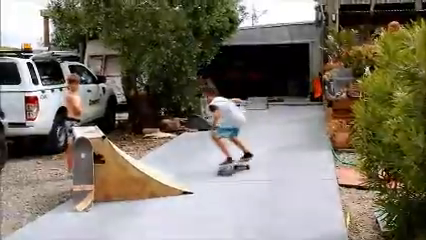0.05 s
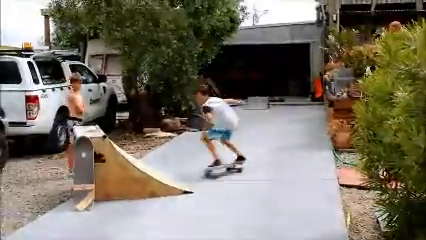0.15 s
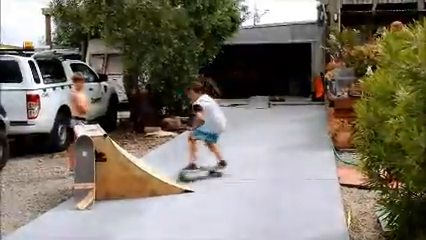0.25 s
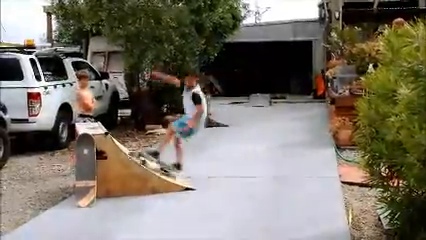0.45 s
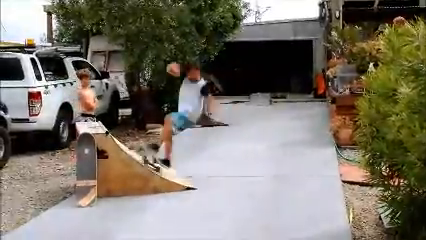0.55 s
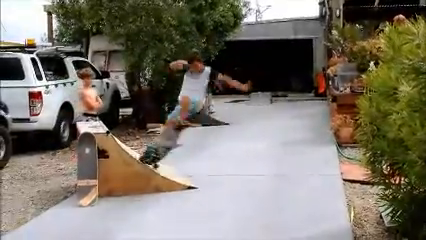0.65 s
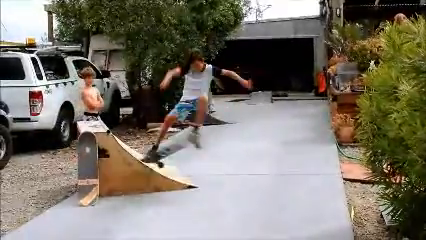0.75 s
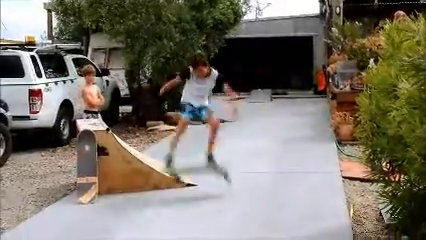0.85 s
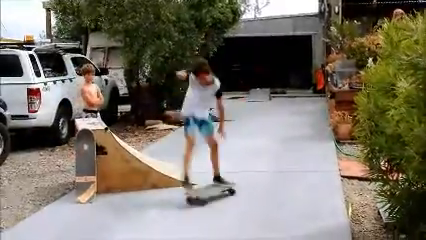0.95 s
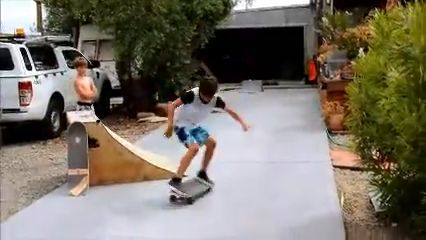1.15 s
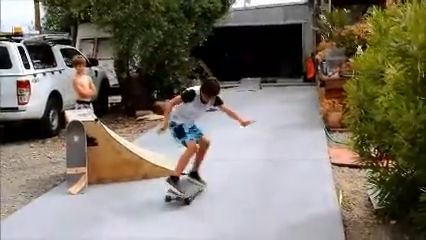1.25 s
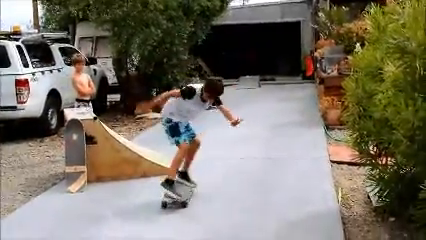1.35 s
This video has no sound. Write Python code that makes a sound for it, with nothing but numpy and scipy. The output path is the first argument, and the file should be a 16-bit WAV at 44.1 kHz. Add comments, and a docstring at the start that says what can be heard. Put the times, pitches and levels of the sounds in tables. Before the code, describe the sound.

A skateboard rumbles over rough concrete, knocks onto a hollow plywood ramp, pops off it and slaps back down with a sharp clatter. Light wind buffets the microphone, and the yard gives a short echo.

```python
"""Concrete driveway with a hollow plywood ramp. A skateboard rumbles over grit and flaws, then knocks
onto the ramp, front wheels then back. It scuffs, pops off the ramp, scrapes, and slaps down on the
concrete with a clatter of deck, trucks and wheels.
Wind nudges the microphone; the yard gives a short echo."""
import sys
import numpy as np
from scipy import signal
from scipy.io import wavfile

SR = 44100
rng = np.random.default_rng(int(sys.argv[2]) if len(sys.argv) > 2 else 0)


def dump(signal):
    """Clip the signal to [-1, 1] and save it as 16-bit WAV at the path in sys.argv[1]."""
    limited = np.clip(np.atleast_2d(signal).T, -1, 1)
    pcm = np.round(limited * 32767).astype(np.int16)
    wavfile.write(sys.argv[1], SR, pcm)


N = 61739
TIME_S = np.arange(N) / SR
PUSH_S = 0.0036  # rise time constant of a boom
# deck flex modes: f/Hz, level/dB, t60/s
DECK_MODES = [(272, 5, 0.034), (386.4, 14.5, 0.024), (476.3, -10, 0.13), (613, 1, 0.057), (705, -1, 0.035),
              (814, -10, 0.031), (907, -8, 0.063)]


def ramp_hits(deck_db=-7, boom_width_oct=0.37):
    """Wheels clack on the plywood, which booms in the modes nearest the struck spot; the deck rings."""
    # blows: t/s, boom/dB, boom centre/Hz, clack/dB, clack cutoff/Hz, chatter decay/s
    hits = [(0.444, -26, 165, -20.5, 2440, 0.0099), (0.4494, -12, 174, -32, 6400, 0.027),
            (0.454, -12, 213, -14.5, 2690, 0.02), (0.4649, -14.5, 234, -18, 2730, 0.014),
            (.4705, -6, 228, -27, 2470, 0.0095), (.574, -17, 147, -25, 8800, 0.006),
            (0.586, -16.5, 162, -21, 3020, 0.011), (.595, -10, 383, -20, 1650, 0.015),
            (0.607, -18, 128, -28.5, 2550, 0.013)]
    # plywood modes: f/Hz, level/dB, t60/s
    ramp_modes = [(136, -3, 0.042), (179, -2, 0.066), (220, 11.5, 0.032), (258, 8, 0.064),
                  (298.5, -8.5, 0.29), (354, 9.5, 0.055), (400, 0.5, 0.041)]
    # clack spectrum: f/Hz, level/dB
    clack_spectrum = [(100, -11), (400, -2.5), (560, -6.5), (850, 2.5), (1150, -8.5), (1600, -1),
                      (1950, -4.5), (2250, 2.5), (2800, -6), (5000, -6.5), (8000, -12.5), (11000, -11)]
    out, t = np.zeros(N), TIME_S[:N // 3]
    for s, boom_db, centre_hz, clack_db, cutoff_hz, chatter_s in hits:
        excited = [(hz, db - 6 * (np.log2(hz / centre_hz) / boom_width_oct) ** 2, t60)
                   for hz, db, t60 in ramp_modes]
        boom = -ring(excited, t) * (1 - np.exp(-t / PUSH_S))
        clack = colour(contact(t, cutoff_hz, chatter_db=0.5, chatter_s=chatter_s), clack_spectrum)
        add(out, s, blow(highpass(boom, hz=96), boom_db))
        add(out, s, blow(clack, clack_db))
        add(out, s, blow(highpass(ring(DECK_MODES, t), hz=368), clack_db + deck_db))
    return out


def landing(ring_db=-10, truck_t60_s=0.06):
    """The board slaps the concrete in quick succession; the trucks ring and the deck thuds."""
    # slaps: t/s, thud/dB, clack/dB, clack cutoff/Hz
    hits = [(1.089, -25, -22, 3230), (1.091, -32, -9.5, 6400), (1.095, -31, -24, 5000),
            (1.1016, -39, -9.5, 4460), (1.106, -24.5, -15, 4530), (1.114, -24, -31, 4450),
            (1.123, -21.5, -24.5, 3500), (1.1269, -10.5, -15, 2620), (1.162, -42, -29.5, 3000),
            (1.166, -37, -29.5, 3020), (1.211, -53, -34, 2260)]
    # metal truck modes: f/Hz, level/dB
    truck_modes = [(1529, -10), (2078, -7), (2210, -3), (2275, -4), (2713, -8), (3020, 0), (3494, -5),
                   (3669, -1), (3895, 0), (4457, -1), (5014, -2), (6557, -1)]
    # slap spectrum: f/Hz, level/dB
    slap_spectrum = [(100, -25), (300, -7.5), (700, -0.5), (1200, -5), (2200, 1.5), (2700, -2.5), (3500, 4),
                     (5400, -1), (6500, -0.5), (7600, -9), (11000, -3)]
    out, t = np.zeros(N), TIME_S[:N // 4]
    trucks = ring([(hz, db, truck_t60_s) for hz, db in truck_modes], t)
    deck = highpass(ring(DECK_MODES, t), hz=205)
    for s, thud_db, clack_db, cutoff_hz in hits:
        clack = colour(contact(t, cutoff_hz, chatter_db=-5, chatter_s=0.011), slap_spectrum)
        metal = signal.fftconvolve(clack, trucks)[:len(t)]
        add(out, s, blow(clack, clack_db) + blow(metal, clack_db + ring_db) + blow(deck, thud_db))
    return out


def pop(at_s=0.8498):
    """The tail cracks dully on the plywood; the unloaded board rings on in the air."""
    # crack spectrum: f/Hz, level/dB
    crack_spectrum = [(200, -4), (480, -8), (700, 4), (950, -1.5), (1150, 3.5), (1950, -6), (2300, 5),
                      (2750, -6.5), (3400, -5.5), (4300, -13), (10000, 2)]
    # unloaded board modes: f/Hz, level/dB, t60/s
    airborne_modes = [(203, -13, 0.29), (244, 7, 0.089), (302.4, -2.5, 0.27), (633, -8, 0.073)]
    out, t = np.zeros(N), TIME_S[:N // 3]
    force = contact(t, cutoff_hz=3860, chatter_db=-1.5, chatter_s=0.005, order=4)
    boom = ring(airborne_modes, t) * (1 - np.exp(-t / PUSH_S))
    add(out, at_s, blow(colour(force, crack_spectrum), db=-16) + blow(boom, db=-11.5))
    return out


def rolling():
    """Grit shakes the deck on concrete and the hollow plywood on the ramp."""
    # rumble envelopes: t/s, level/dB
    on_concrete = [(0, -23), (.055, -32), (.09, -30), (.12, -35), (.205, -21.5), (.245, -31), (.3, -29.5),
                   (.47, -51), (1.12, -88), (1.17, -35.5), (1.24, -40), (1.31, -57)]
    on_ramp = [(.42, -30.5), (.47, -16.5), (.53, -28), (.57, -26), (.64, -23), (.7, -31), (.8, -32),
               (.9, -32), (1, -35), (1.12, -53)]
    # rumble spectra: f/Hz, level/dB
    deck_spectrum = [(40, -9), (110, -18), (170, 0), (270, -1), (420, 0.5), (550, -14.5), (700, -10.5),
                     (900, -16.5), (1150, -31), (2500, -51.5)]
    plywood_spectrum = [(40, 4), (100, -5.5), (180, 5), (340, -2), (500, -10), (1000, -23), (8000, -50)]
    return envelope(on_concrete) * rattle(deck_spectrum) + envelope(on_ramp) * rattle(plywood_spectrum)


def bumps(chatter_gain=0.056, decay_s=0.023, edge_ratio=1.5):
    """A wheel drops over a flaw in the concrete: one low jolt and a short chatter."""
    # flaws: t/s, level/dB, centre/Hz
    flaws = [(.125, -25, 522), (.179, -38, 297), (.202, -23.5, 514), (.272, -28, 570), (.296, -18, 250),
             (0.361, -20, 203)]
    out, t = np.zeros(N), TIME_S[:N // 10]
    for s, db, hz in flaws:
        chatter = chatter_gain * rng.standard_normal(len(t)) * np.exp(-t / decay_s)
        jolt = signal.unit_impulse(len(t)) + chatter
        add(out, s, blow(band(jolt, (hz / edge_ratio, hz * edge_ratio)), db))
    return out


def scuffs():
    """Wheels growl on rough patches and scrub in a turn; shoes and deck rub; a scrape meets the landing."""
    # rough patches, rubs: peak t/s, half length/s, level/dB
    patches = [(.134, 0.0053, -30), (.213, 0.0088, -29.5), (.28, 0.007, -32)]
    rubs = [(.364, 0.0081, -40), (.78, 0.011, -31.5), (.821, 0.0065, -32.5), (.893, 0.0023, -29),
            (.905, 0.004, -35.5)]
    # friction spectra: f/Hz, level/dB
    rub_spectrum = [(300, -32), (1000, -5.5), (1800, 4), (3000, -13), (5200, -2.5), (7000, -24.5),
                    (11000, -21.5)]
    scrape_spectrum = [(200, -31), (700, 6), (1150, -12), (1500, -4), (1800, 7), (2200, -14), (4000, -19),
                       (6000, -15), (10000, -31)]
    # scrape envelope: t/s, level/dB
    scrape_levels = [(1.012, -80), (1.022, -33), (1.035, -42), (1.06, -33), (1.087, -22.5), (1.11, -82)]
    growl = swells(patches) * band(grit(), edges_hz=(404, 863))
    scrub = swells([(0.275, 0.065, -50)]) * band(rng.standard_normal(N), edges_hz=(4250, 4860))
    rubbing = swells(rubs) * unit_rms(hiss(rub_spectrum) + 0.69 * rattle(rub_spectrum))
    scrape = envelope(scrape_levels) * hiss(scrape_spectrum)
    return growl + scrub + rubbing + scrape


def bearings():
    """The wheel bearings whirr and rattle."""
    # whirr envelope: t/s, level/dB
    levels = [(0, -48), (.22, -41.5), (.36, -39.5), (.7, -42.5), (.85, -39), (1, -44.5), (1.2, -35.5),
              (1.3, -46), (1.4, -51)]
    # whirr spectrum: f/Hz, level/dB
    spectrum = [(200, 8), (2000, 9.5), (3000, 3.5), (4900, 0.5), (6000, -5.5), (11000, -18)]
    return envelope(levels) * unit_rms(hiss(spectrum) + 0.58 * rattle(spectrum))


def yard_echo(x, gain_db=-15, delay_s=0.012, echoes_per_s=2500):
    """Scattered echoes from walls, car and bushes, each band dying at its own rate."""
    # echo decay: f/Hz, t60/s
    decay_times = [(150, 0.077), (500, 0.61), (1500, 0.11), (4000, 0.17), (10000, 0.36)]
    taps = rng.standard_normal(N // 2) * (rng.random(N // 2) < echoes_per_s / SR)
    hz, t, bands = signal.stft(taps, SR, nperseg=256)
    t60_s = np.interp(hz, *np.transpose(decay_times))[:, None]
    tail = signal.istft(bands * np.exp(-np.log(1000) * t / t60_s), SR)[1]
    out = np.zeros(N)
    add(out, delay_s, signal.fftconvolve(x, tail / np.linalg.norm(tail)))
    return amp(gain_db) * highpass(out, hz=222)


def wind():
    """Gusts buffet the microphone with a low rumble."""
    # gust envelope: t/s, level/dB
    gusts = [(0, -34), (.1, -49), (.3, -35), (.43, -31.5), (.52, -58), (.61, -32.5), (1.03, -39),
             (1.11, -47), (1.17, -79)]
    # wind spectrum: f/Hz, level/dB
    spectrum = [(10, 0), (45, -4.5), (90, 5), (170, -2.5), (400, -42), (2000, -70)]
    return envelope(gusts) * hiss(spectrum)


def outdoor_air(level_db=-56):
    """Faint, steady outdoor noise."""
    # air spectrum: f/Hz, level/dB
    spectrum = [(20, -18), (150, -10), (500, 12), (1000, -28), (2500, -3), (4500, -24), (7000, -10),
                (11000, -54)]
    return amp(level_db) * hiss(spectrum)


def contact(t, cutoff_hz, chatter_db, chatter_s, order=2, crunch_s=0.0012):
    """A brief crunch and a dying chatter, dulled by the softness of the contact."""
    crunch, chatter = rng.standard_normal((2, len(t)))
    force = blow(crunch * np.exp(-t / crunch_s), 0) + blow(chatter * np.exp(-t / chatter_s), chatter_db)
    return signal.lfilter(*signal.butter(order, cutoff_hz, fs=SR), force)


def grit(grains_per_s=1100, spread_db=2.5):
    """Tiny bumps of uneven size under the wheels."""
    sizes = amp(spread_db * np.minimum(rng.exponential(1, N), 3))
    return sizes * rng.choice([-1, 1], N) * (rng.random(N) < grains_per_s / SR)


def rattle(spectrum):
    """Coloured grit, rms 1."""
    return unit_rms(colour(grit(), spectrum))


def hiss(spectrum):
    """Coloured noise, rms 1."""
    return unit_rms(colour(rng.standard_normal(N), spectrum))


def ring(modes, t):
    """Sum of decaying sines."""
    return sum(amp(db) * np.exp(-np.log(1000) * t / t60) * np.sin(2 * np.pi * hz * t)
               for hz, db, t60 in modes)


def colour(x, spectrum):
    """Minimum-phase filter through points of f/Hz, level/dB."""
    points_hz, db = np.transpose(spectrum)
    hz = abs(np.fft.fftfreq(8192, 1 / SR))
    log_gain = np.log(amp(np.interp(np.log(hz + 1), np.log(points_hz), db)))
    taps = np.fft.ifft(np.exp(np.conj(signal.hilbert(log_gain)))).real[:4096]
    return signal.fftconvolve(x, taps)[:len(x)]


def highpass(x, hz):
    """Low cut: a small body radiates little below hz."""
    return signal.sosfilt(signal.butter(3, hz, "highpass", fs=SR, output="sos"), x)


def band(x, edges_hz):
    """Band-pass, rms 1."""
    return unit_rms(signal.sosfilt(signal.butter(3, edges_hz, "bandpass", fs=SR, output="sos"), x))


def envelope(points):
    """Gain through points of t/s, level/dB."""
    return amp(np.interp(TIME_S, *np.transpose(points)))


def swells(rows):
    """Gaussian gains from rows of peak t/s, half length/s, level/dB."""
    return sum(amp(db) * np.exp(-((TIME_S - s) / half_s) ** 2) for s, half_s, db in rows)


def blow(x, db, span_s=0.01):
    """Scales a hit to the energy of span_s at level db."""
    return amp(db) * x * np.sqrt(span_s * SR / np.sum(x ** 2))


def unit_rms(x):
    """Scales to rms 1."""
    return x / np.sqrt(np.mean(x ** 2) + 1e-20)


def amp(db):
    """dB to gain."""
    return 10 ** (np.asarray(db) / 20)


def add(mix, at_s, sound):
    """Mixes a sound in from at_s."""
    part = mix[round(at_s * SR):][:len(sound)]
    part += sound[:len(part)]


def scene():
    """Board, echo, wind and air; mono."""
    board = rolling() + bearings() + bumps() + ramp_hits() + pop() + landing() + scuffs()
    board = highpass(board, hz=62.5)
    return (board + yard_echo(board) + wind() + outdoor_air())[None]


def record(dry):
    """Clips the loudest peaks, then low-passes at 11.6 kHz."""
    clipped = np.clip(dry, -0.9, 0.9)
    lowpass = signal.firwin(301, 11600, window=("kaiser", 8), fs=SR)
    return signal.oaconvolve(clipped, lowpass[None], "same")


dry = scene()
out = record(dry)
dump(out)
```